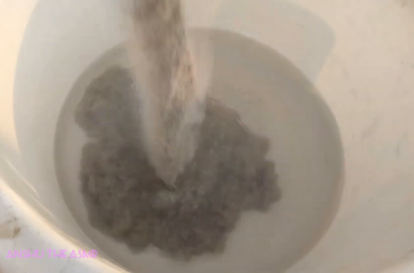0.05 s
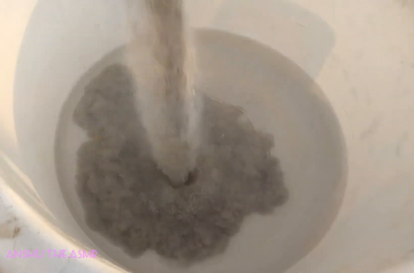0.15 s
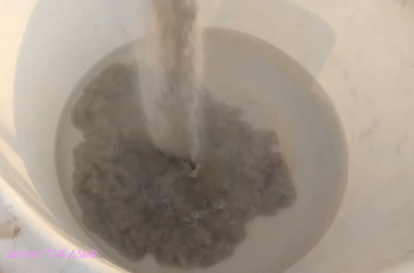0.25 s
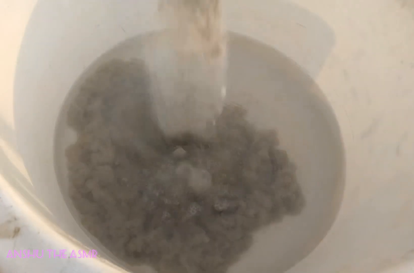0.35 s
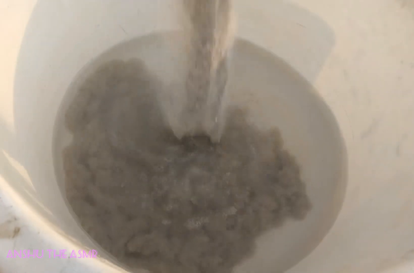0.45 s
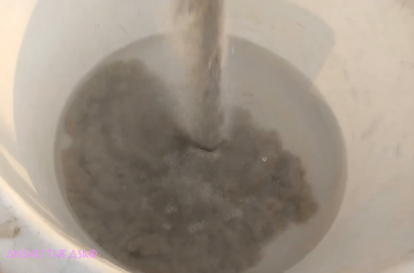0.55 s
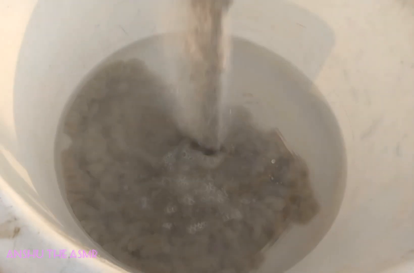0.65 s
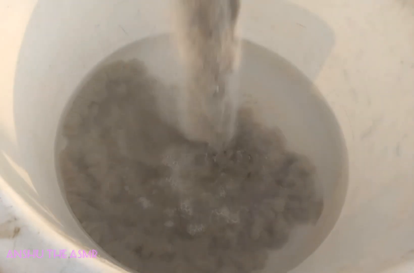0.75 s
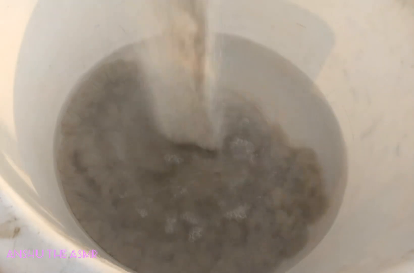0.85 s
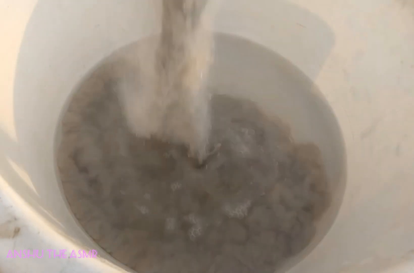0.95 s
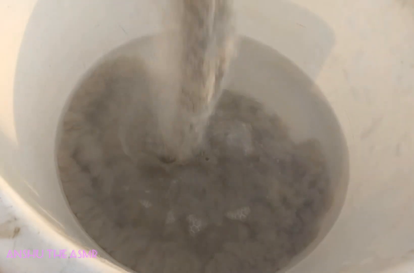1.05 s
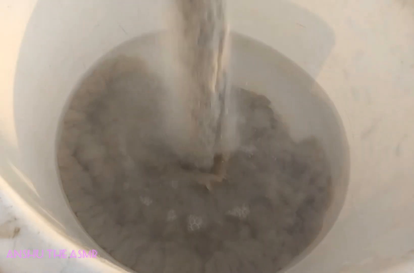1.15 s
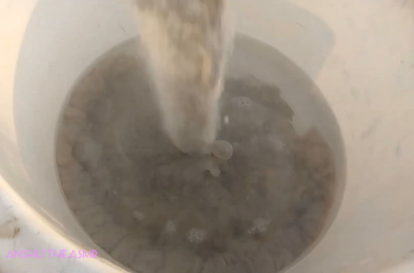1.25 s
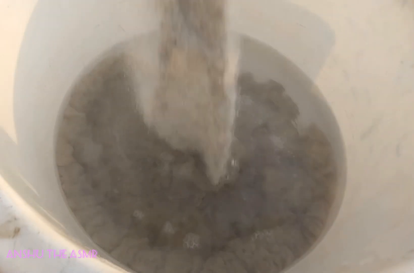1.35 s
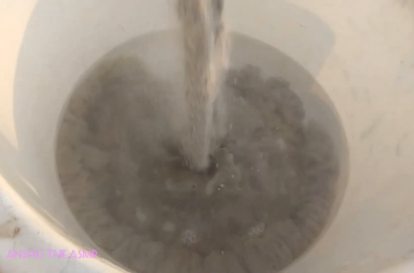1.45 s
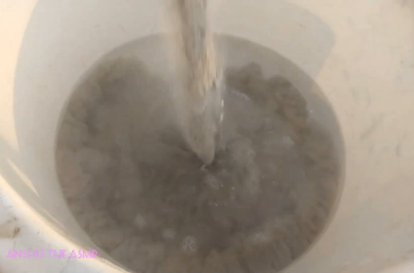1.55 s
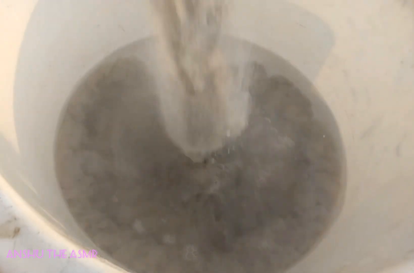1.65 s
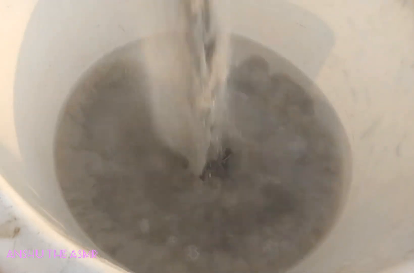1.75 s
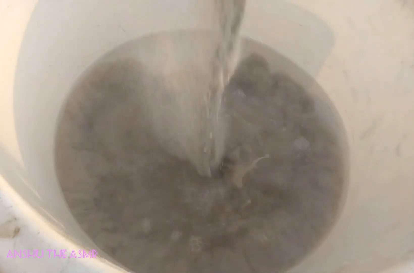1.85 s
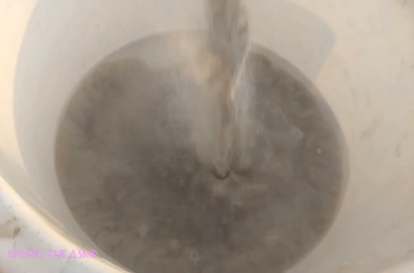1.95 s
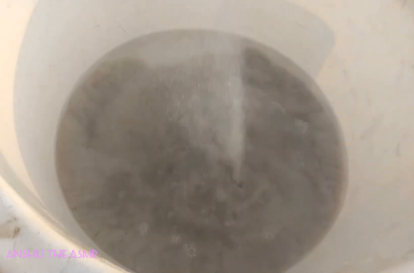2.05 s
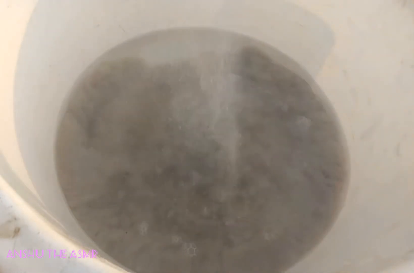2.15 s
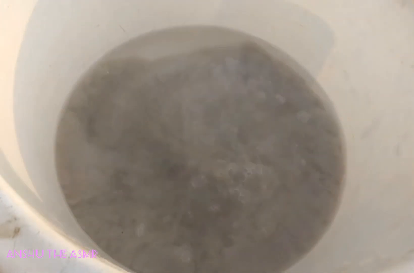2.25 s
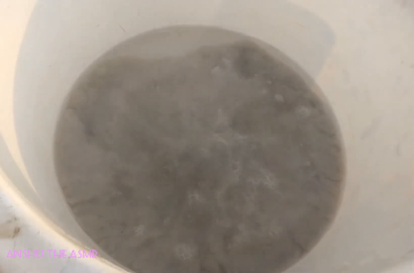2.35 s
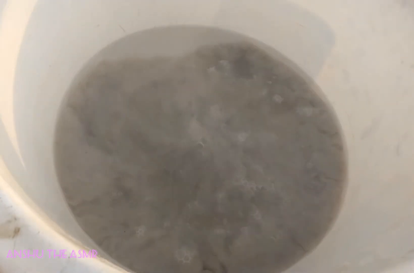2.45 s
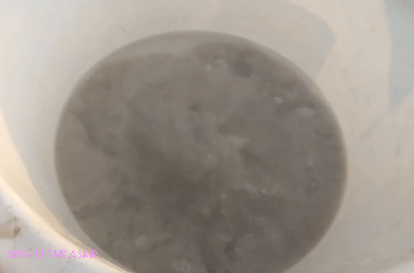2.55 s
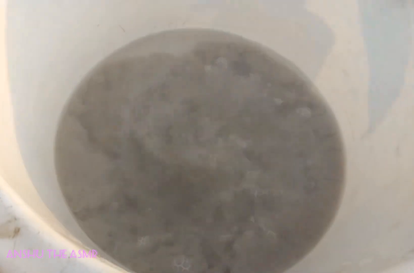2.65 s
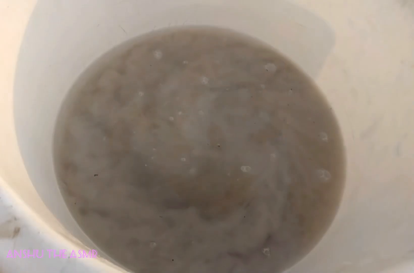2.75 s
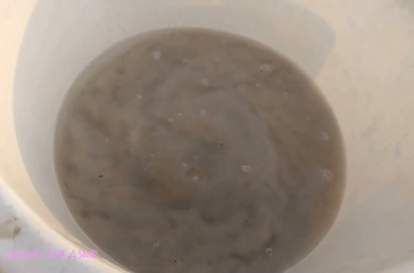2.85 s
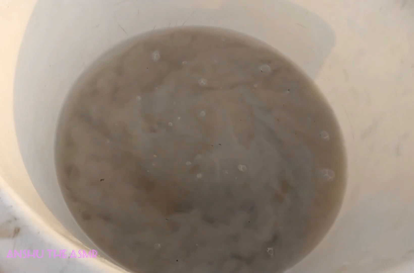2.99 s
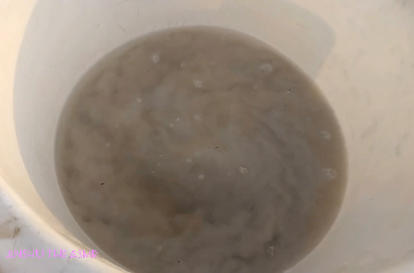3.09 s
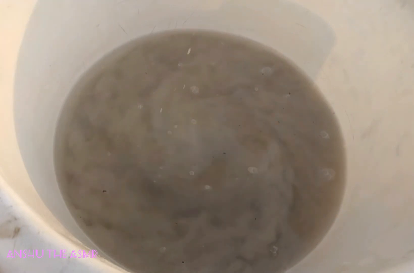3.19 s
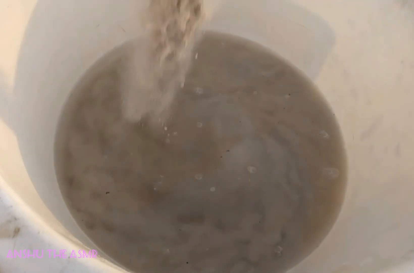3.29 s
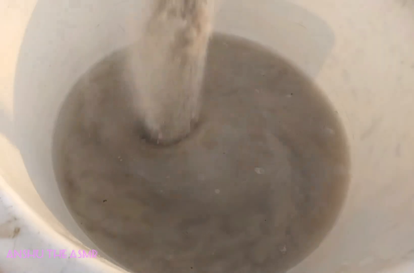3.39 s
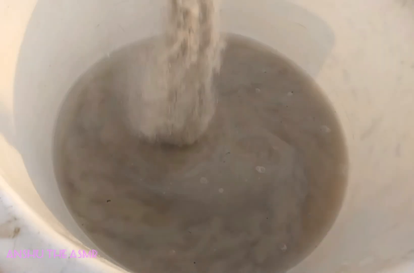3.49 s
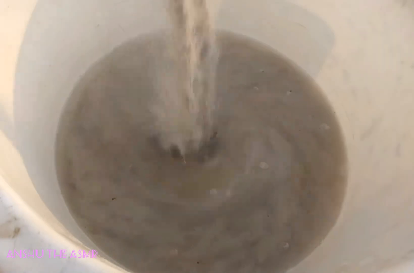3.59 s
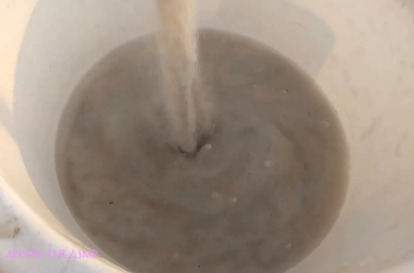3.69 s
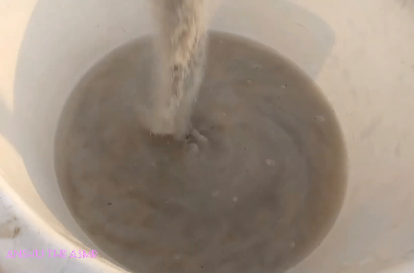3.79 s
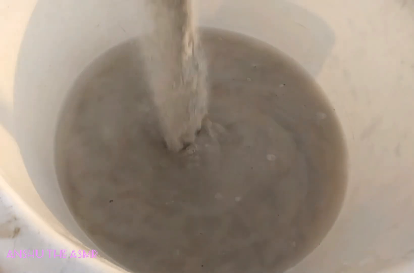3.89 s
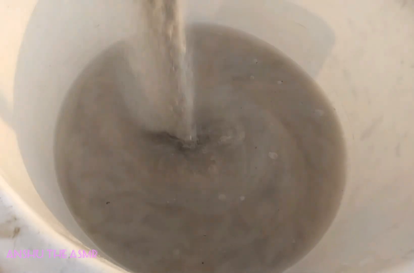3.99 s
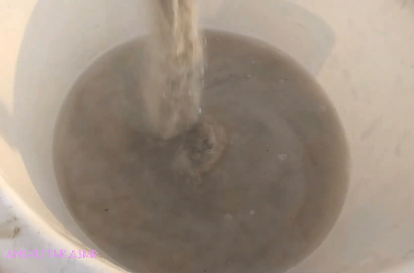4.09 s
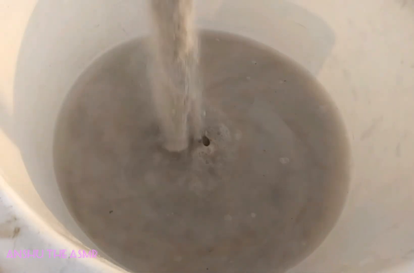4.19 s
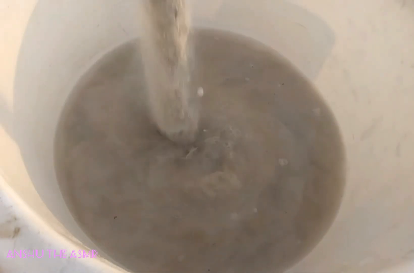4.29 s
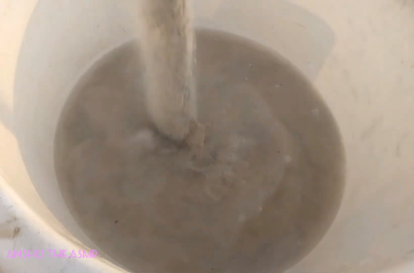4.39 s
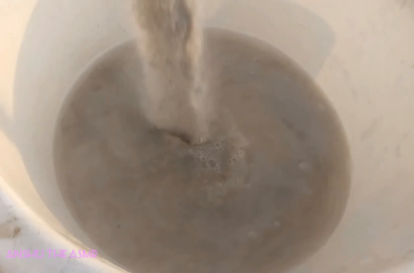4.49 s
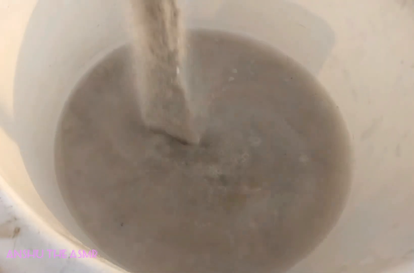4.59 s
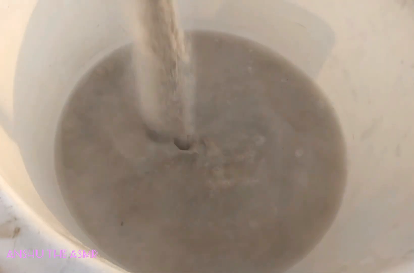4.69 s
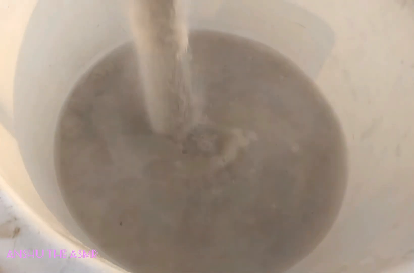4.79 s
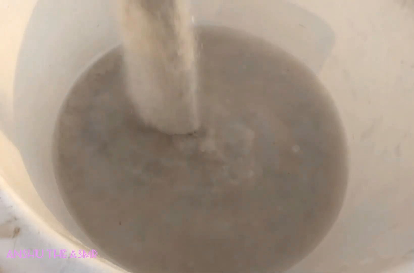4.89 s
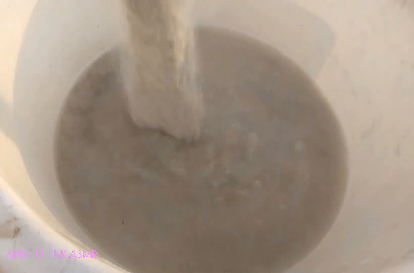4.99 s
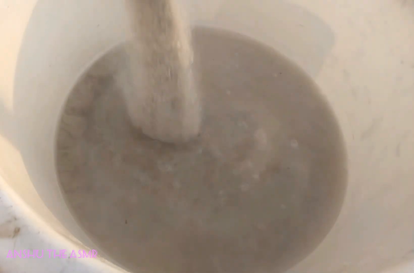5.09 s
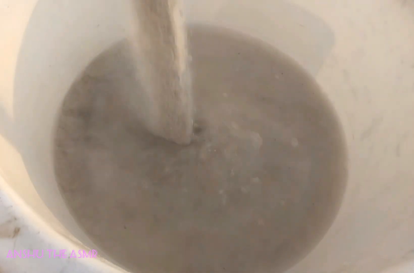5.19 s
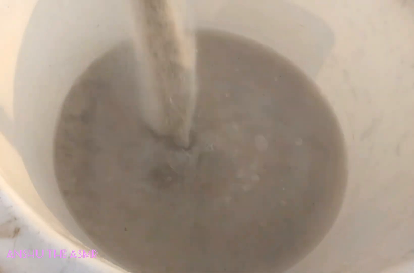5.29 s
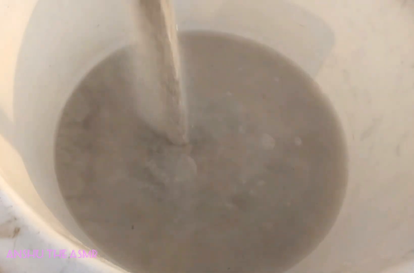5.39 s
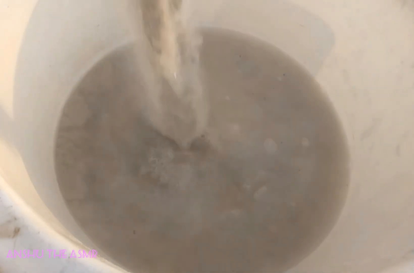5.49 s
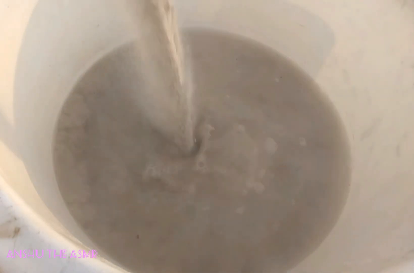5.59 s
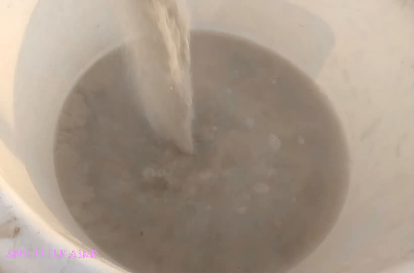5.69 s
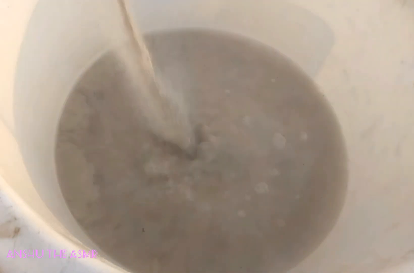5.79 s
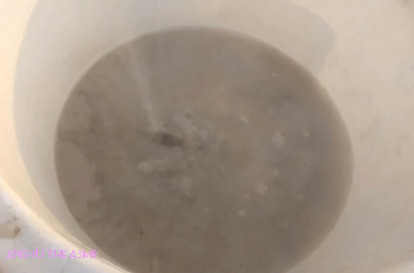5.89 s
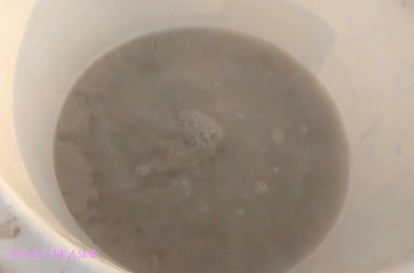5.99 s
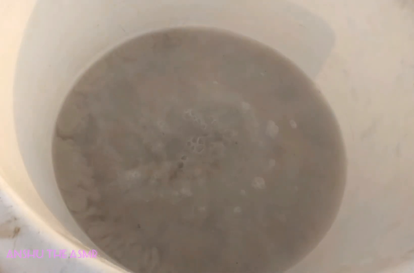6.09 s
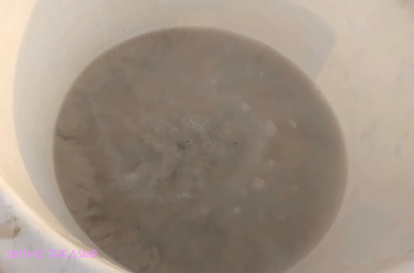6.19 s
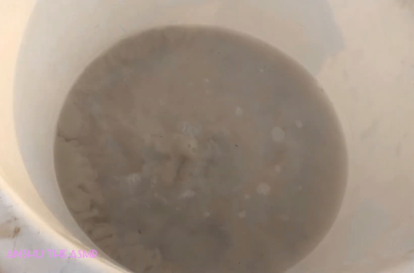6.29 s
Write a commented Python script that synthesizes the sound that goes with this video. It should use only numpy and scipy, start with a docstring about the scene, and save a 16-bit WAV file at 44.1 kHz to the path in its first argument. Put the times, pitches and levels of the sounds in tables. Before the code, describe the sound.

Sand falls into water in a small plastic tub, heard very near: uneven rushing splashes, ringing bubbles, gurgles and fine fizz. The first pour dies away, leaving soft open air and distant engines; a second pour follows and stops with a few last plops. Traffic rumble grows late, a bird chirps faintly, and the almost mono sound cuts out twice for an instant.

```python
"""Outdoors at a plastic tub of water: two streams of fine sand fall in, one after the other, heard close up.
The sand drags air under: bubbles of all sizes ring in clumps, and modes of the air in the tub colour them.
Plops, gushes and ticks of spray stand out as single events built from ringing bubbles and noise bursts.
Distant traffic drones behind over open air, as coloured noise and wavering tones; a bird whistles once, a sine.
The image is nearly mono, and the sound drops out twice for a moment."""
import sys
import numpy as np
from scipy import signal
from scipy.io import wavfile
from scipy.ndimage import uniform_filter1d

SR = 44100
rng = np.random.default_rng(int(sys.argv[2]) if len(sys.argv) > 2 else 0)


def generate_wav(sig):
    """Save sig (samples, or channels by samples) to the path in sys.argv[1] as 16-bit PCM at SR."""
    pcm = np.round(np.clip(np.atleast_2d(sig).T, -1, 1) * 32767).astype(np.int16)
    wavfile.write(sys.argv[1], SR, pcm)


N = 279594
T = np.arange(N) / SR

# moments of silence: from_s, to_s
GAPS = [(2.6722, 2.6945), (4.501, 4.5598)]


def gain_of(db):
    """Decibels to an amplitude factor."""
    return 10 ** (np.asarray(db) / 20)


def evened(x):
    """Scales a sound to rms 1."""
    return x / np.sqrt(np.mean(x ** 2) + 1e-20)


def read(points, hz):
    """Reads a spectrum at hz, with straight lines on a log-frequency axis."""
    point_hz, value = np.transpose(points)
    return np.interp(np.log(hz + 1), np.log(point_hz + 1), value)


def coloured(x, taps):
    """Passes a sound through a filter."""
    return signal.oaconvolve(x, taps)[:len(x)]


def taps_of(shape_db):
    """Causal filter with the gain shape_db(hz): minimum phase from the log gain."""
    hz = np.fft.rfftfreq(4096, 1 / SR)
    half = np.log(gain_of(np.maximum(shape_db(hz), -100)))
    full = np.concatenate([half, half[-2:0:-1]])
    return np.fft.ifft(np.exp(np.conj(signal.hilbert(full)))).real[:2048]


def drift(hz, count):
    """Random wander of rms 1: noise smoothed below hz."""
    sos = signal.butter(2, hz, fs=SR, output="sos")
    return evened(signal.sosfilt(sos, rng.standard_normal(count)))


def patchy(points, patch_db, frames_wide, bins_wide):
    """Noise of a given colour whose level drifts in patches of time and pitch."""
    hz = np.fft.rfftfreq(2048, 1 / SR)
    real, imaginary, patches = rng.standard_normal((N // 512 + 5, len(hz), 3)).T
    patches = uniform_filter1d(patches, bins_wide, 0)
    patches = evened(uniform_filter1d(patches, frames_wide, 1))
    level_db = read(points, hz)[:, None] + patch_db * patches
    spectrum = (real + 1j * imaginary) * gain_of(level_db)
    return evened(signal.istft(spectrum, nperseg=2048, noverlap=1536)[1][:N])


def tone(hz, db):
    """A sine of moving pitch and rms level, its phase summed from the pitch."""
    return gain_of(db) * np.sqrt(2) * np.sin(2 * np.pi * np.cumsum(hz) / SR)


def add(mix, s, sound, db):
    """Adds a short sound at time s with the given peak."""
    part = mix[round(s * SR):][:len(sound)]
    part += gain_of(db) * sound[:len(part)] / abs(sound).max()


def within(events, start_s, end_s):
    """The events that begin while a stream lasts."""
    return [event for event in events if start_s <= event[0] < end_s]


def open_air():
    """The air around the tub: soft coloured noise, uneven in time and pitch."""
    # spectrum: pitch_hz, level_db (per Hz)
    air_colour = [(350, -17.5), (600, -10), (1200, -12.5), (2900, -22), (4200, -27), (6500, -40),
                  (8200, -30.5), (10000, -43), (12500, -47), (15500, -44)]
    # level over time: time_s, level_db
    air_level = [(0, -53), (2.67, -52.5), (2.75, -55.5), (2.86, -51.5), (3.05, -54.5), (6.34, -51.5)]
    noise = patchy(air_colour, 1.6, frames_wide=5, bins_wide=20)
    return gain_of(np.interp(T, *np.transpose(air_level))) * noise


def traffic():
    """A low noise drone with two wavering tones standing out, over a slowly growing rumble."""
    # drone and engine tone: time_s, drone_db, tone_hz, tone_db
    passing = [(0.0, -51.5, 246, -64), (0.5, -48.5, 246.8, -51.5), (0.8, -47.5, 246, -58),
               (0.95, -48, 245, -63), (1.35, -47, 247.7, -59.5), (1.78, -44, 252, -52),
               (2.05, -43.5, 243, -50.5), (2.3, -47, 238, -50), (2.46, -42.5, 237, -45),
               (2.48, -47, 202.5, -49.5), (2.67, -41.5, 200, -39), (2.7, -48.5, 235, -53),
               (2.98, -49, 232.5, -59.5), (3.05, -49, 232.3, -44), (3.3, -46, 232, -46.5),
               (3.42, -47.5, 225, -52), (3.55, -47.5, 231, -46.5), (3.7, -49, 231.5, -54.5),
               (4.1, -44.5, 230, -53), (4.29, -43, 226.5, -54), (4.56, -45, 215, -59),
               (4.71, -35.5, 203.5, -42.5), (4.95, -36, 208.8, -43.5), (5.3, -38.5, 200.1, -43.5),
               (5.8, -38, 197, -51), (6.03, -36.5, 196.7, -45), (6.34, -46.5, 193, -45.5)]
    # lower engine tone that roams in pitch: time_s, tone_hz, over_drone_db
    low_tone = [(0, 163.4, -14), (2.67, 170.6, -10), (2.9, 159.4, -3.5), (4.0, 143.4, -11),
                (4.3, 140.1, -6.5), (4.7, 166, -3), (5.1, 165.1, -14), (5.9, 140.7, -2.5),
                (6.34, 149.4, -2.5)]
    # drone spectrum: pitch_hz, level_db (per Hz)
    drone_colour = [(59, -49), (100, -34), (128, -6.5), (194, -2), (243, -5), (350, -3.5), (404, -6),
                    (520, -22), (1000, -36), (1300, -43), (2200, -120)]
    # rumble spectrum: pitch_hz, level_db (per Hz)
    rumble_colour = [(15, -62), (25, -48), (45, -35), (70, 9.5), (100, 10), (130, 19), (200, -62)]
    # rumble over time: time_s, level_db
    rumble_level = [(0, -58.5), (3.8, -53.5), (4.6, -52.5), (6.34, -44.5)]

    s, *curves = np.transpose(passing)
    drone_db, high_hz, high_db = (np.interp(T, s, curve) for curve in curves)
    s, *curves = np.transpose(low_tone)
    low_hz, low_over_db = (np.interp(T, s, curve) for curve in curves)
    low_hz = low_hz * (1 + 0.05 * drift(2.93, N))

    out = gain_of(drone_db) * patchy(drone_colour, 2.4, frames_wide=11, bins_wide=2)
    rumble_db = np.interp(T, *np.transpose(rumble_level))
    out += gain_of(rumble_db) * patchy(rumble_colour, 2.4, frames_wide=14, bins_wide=2)
    for hz, db, flutter_db in ((low_hz, drone_db + low_over_db, 3.5), (high_hz, high_db, 2.2)):
        waver = hz * (1 + 0.007 * drift(10, N))
        out += tone(waver, db + flutter_db * drift(22.4, N))
    return out


def bird():
    """A far bird's falling whistle: a sine whose pitch flutters quickly at random."""
    # time_s, pitch_hz, level_db
    whistle = [(5.955, 3900, -75), (5.981, 3800, -59), (6.03, 3560, -56), (6.075, 3350, -66)]
    s, hz, db = np.transpose(whistle)
    pitch = np.interp(T, s, hz) * (1 + 0.045 * drift(250, N))
    return tone(pitch, np.interp(T, s, db, -120, -120))


def puff(hz, width_hz, seconds):
    """A short spindle of noise around hz: many grains breaking the surface at once."""
    t = np.arange(int(3 * seconds * SR) + 8) / SR
    edges = np.clip([hz - width_hz / 2, hz + width_hz / 2], 100, 20000)
    sos = signal.butter(2, edges, "band", fs=SR, output="sos")
    envelope = t / seconds * np.exp(-2.4 * t / seconds)
    return signal.sosfilt(sos, rng.standard_normal(len(t))) * envelope


def bubble(hz, cycles, glide, rise):
    """A bubble swells over about `rise` cycles, dies 60 dB over `cycles` and climbs in pitch by `glide`."""
    turns = np.arange(int(cycles / hz * SR) + 8) * hz / SR
    swell = (1 - np.exp(-turns / rise)) ** 2
    ring = np.sin(2 * np.pi * turns * (1 + glide * turns / cycles))
    return gain_of(-60 * turns / cycles) * swell * ring


def ticks(out, start_s, end_s, bright_ring):
    """Fine spray bursting at the surface: tiny bright puffs of noise coloured by the tub."""
    # start_s, peak_db
    spray_bursts = [(0.2468, -29), (0.372, -30), (0.552, -21), (0.6, -30), (0.6604, -28), (0.799, -32),
                    (0.8555, -26.5), (0.879, -29), (0.924, -27.5), (1.1, -27), (1.349, -28), (1.508, -27),
                    (1.549, -14.5), (1.625, -23), (1.6576, -30), (1.6846, -32), (1.8667, -34), (1.938, -25),
                    (1.9534, -24), (2.206, -26), (2.3046, -37), (2.318, -42), (2.366, -43), (2.48, -50),
                    (2.548, -50), (2.635, -50), (3.192, -51), (3.206, -52), (3.224, -51), (3.263, -43),
                    (3.3169, -29), (3.3413, -33), (3.388, -37), (3.4203, -26), (3.445, -23.5), (3.482, -23),
                    (3.5344, -33), (3.5665, -31), (3.5912, -27), (3.662, -25), (3.743, -26), (3.799, -23),
                    (3.911, -27), (3.9616, -30), (4.0903, -25), (4.1335, -25), (4.2462, -25.5),
                    (4.2857, -32), (4.389, -28), (4.4393, -33), (4.45, -19), (4.4914, -25), (4.5875, -31),
                    (4.625, -18.5), (4.6493, -29), (4.7042, -33), (4.8344, -28), (4.876, -24.5),
                    (4.981, -25), (5.07, -20.5), (5.1, -23), (5.153, -23), (5.2096, -25), (5.234, -26.5),
                    (5.413, -28), (5.488, -38), (5.6274, -24), (5.718, -34), (5.779, -39), (5.811, -39),
                    (5.869, -35), (5.933, -32)]
    for s, db in within(spray_bursts, start_s, end_s):
        burst = puff(9000 * 2 ** rng.uniform(-0.38, 0.39), 9000, 0.0023)
        add(out, s, np.convolve(burst, bright_ring[:300]), db)


def gushes(out, start_s, end_s, ring):
    """Wide splashes: noise that swells and fades, coloured by the tub."""
    # middle_s, peak_db, length_s
    wide_splashes = [(0.284, -26.5, 0.03), (0.322, -24.5, 0.025), (0.373, -16, .018), (0.493, -32, 0.021),
                     (0.557, -21.5, .012), (0.64, -28, 0.019), (0.711, -20, 0.014), (0.793, -25.5, 0.032),
                     (0.883, -23, .015), (0.94, -21, 0.043), (0.979, -27, 0.023), (1.025, -34, 0.035),
                     (1.134, -34, 0.02), (1.331, -29, 0.038), (1.444, -29, 0.028), (1.517, -24, .016),
                     (1.571, -20.5, 0.036), (1.625, -24, 0.029), (1.66, -31, .025), (1.701, -24.5, 0.018),
                     (1.773, -21, 0.026), (1.84, -28, 0.024), (1.881, -23.5, 0.031), (1.943, -18, 0.016),
                     (1.956, -25, .012), (2.143, -28, 0.029), (2.22, -25, 0.056), (3.39, -21.5, .018),
                     (3.435, -30, 0.017), (3.483, -27, 0.032), (3.566, -24, .015), (3.609, -25.5, 0.027),
                     (3.65, -27, 0.027), (3.797, -22.5, 0.035), (3.901, -27, 0.03), (3.976, -35, .02),
                     (4.106, -32, 0.028), (4.244, -28, 0.045), (4.396, -25.5, 0.027), (4.448, -19.5, 0.023),
                     (4.492, -24.5, .018), (4.601, -22, .02), (4.633, -24, 0.017), (4.706, -20, 0.027),
                     (4.746, -24.5, 0.031), (4.879, -21, .012), (4.948, -35, .015), (4.98, -21, .012),
                     (5.066, -21, .025), (5.104, -24, 0.018), (5.172, -18.5, .025), (5.416, -27, 0.02),
                     (5.602, -22.5, .02), (5.631, -15, .009)]
    for s, db, length in within(wide_splashes, start_s, end_s):
        window = np.hanning(round(length * SR))
        grains = rng.standard_normal(len(window)) * window
        add(out, s - length / 2, np.convolve(grains, ring[:600]), db)


def risers(out, start_s, end_s):
    """Late bubbles nearing the surface, their pitch climbing steeply."""
    # start_s, peak_db, starting_hz
    late_bubbles = [(2.549, -47, 946), (2.558, -44, 760), (2.625, -48, 820), (2.655, -52, 1610)]
    for s, db, hz in within(late_bubbles, start_s, end_s):
        add(out, s, bubble(hz, cycles=60, glide=0.7, rise=3), db)


def plops(out, start_s, end_s, ring):
    """Lumps of sand plunging, each with one large ringing bubble and a splash of noise."""
    # time_s, peak_db (of the bubble), bubble_hz
    lumps = [(0.032, -32.5, 4480), (0.2144, -30.5, 1970), (0.2753, -28, 2530), (0.301, -27, 1300),
             (0.310, -23, 2900), (0.3695, -21.5, 2880), (0.377, -27.5, 646), (0.444, -23, 3100),
             (0.450, -27.5, 590), (0.463, -22.5, 2290), (0.493, -22, 3100), (0.5177, -25, 3110),
             (0.574, -27.5, 1290), (0.638, -27.5, 1190), (0.6688, -27, 3680), (0.709, -11.5, 1740),
             (0.7237, -18.5, 1620), (0.746, -23, 1310), (0.759, -26, 2120), (0.781, -18.5, 1770),
             (0.7969, -15.5, 2440), (0.804, -25, 540), (0.838, -21, 2260), (0.8492, -16.5, 3420),
             (0.861, -24, 1290), (0.882, -21.5, 2200), (0.887, -28, 560), (0.917, -23.5, 2320),
             (0.9416, -28, 920), (0.949, -22, 3340), (0.9727, -25, 3250), (0.9814, -24.5, 1170),
             (0.983, -29.5, 573), (1.016, -25, 586), (1.1, -28.5, 3270), (1.13, -27.5, 880),
             (1.2213, -30, 2350), (1.2388, -27.5, 1000), (1.2501, -27, 2140), (1.28, -20, 2280),
             (1.2997, -18.5, 1380), (1.3122, -19.5, 1330), (1.335, -33, 600), (1.3488, -24, 3650),
             (1.3954, -26.5, 2310), (1.441, -21, 1290), (1.4522, -24, 2400), (1.4863, -30, 3280),
             (1.508, -24.5, 1350), (1.511, -22.5, 574), (1.516, -22.5, 3230), (1.569, -23, 1710),
             (1.579, -27, 1730), (1.5907, -20.5, 3560), (1.623, -21, 2270), (1.626, -25, 650),
             (1.6477, -17, 2170), (1.694, -20.5, 1335), (1.7376, -18, 3320), (1.767, -19, 2230),
             (1.8063, -19, 2250), (1.8415, -28.5, 1150), (1.876, -24, 2320), (1.9111, -27, 2690),
             (1.9396, -27, 1194), (1.939, -26, 2950), (1.954, -23, 2670), (1.9957, -29, 2230),
             (2.136, -29, 2100), (2.16, -25.5, 1310), (2.211, -27.5, 1690), (2.222, -24, 3560),
             (2.27, -32, 606), (3.317, -26, 3570), (3.3878, -20.5, 1640), (3.388, -14.5, 2710),
             (3.432, -24, 1730), (3.453, -17, 1645), (3.5413, -33, 2640), (3.5658, -32, 1460),
             (3.5957, -20.5, 2250), (3.6068, -24.5, 2460), (3.6464, -21, 2590), (3.7527, -30, 2610),
             (3.799, -23, 1760), (3.804, -31, 536), (3.8624, -27, 1230), (3.8713, -22, 1700),
             (3.892, -20.5, 2310), (3.917, -19, 2690), (3.9614, -27, 2740), (4.002, -30, 604),
             (4.0264, -31, 3770), (4.0991, -30, 3630), (4.1255, -27, 1560), (4.1333, -32, 2640),
             (4.1836, -30, 2570), (4.1969, -26.5, 1290), (4.2143, -24, 2320), (4.229, -23, 1390),
             (4.247, -21, 2260), (4.246, -28, 356), (4.26, -22.5, 2670), (4.3126, -27.5, 2600),
             (4.3453, -22, 1540), (4.365, -24, 2550), (4.3954, -22, 2610), (4.402, -25, 1720),
             (4.447, -20, 2660), (4.4507, -15.5, 5040), (4.467, -24.5, 1730), (4.4896, -27, 484),
             (4.572, -24, 2440), (4.5967, -23, 1600), (4.6299, -30, 2530), (4.68, -22, 1530),
             (4.7021, -29, 3420), (4.7378, -22, 2600), (4.8221, -35, 2620), (4.8753, -27, 3720),
             (4.891, -24, 3720), (4.9428, -25.5, 2600), (4.964, -29, 2670), (4.981, -20.5, 3470),
             (5.064, -26, 2650), (5.071, -22.5, 2670), (5.084, -26, 2630), (5.103, -21.5, 514),
             (5.126, -26, 530), (5.1276, -19, 2630), (5.173, -29, 1750), (5.226, -34, 2620),
             (5.359, -27, 2670), (5.413, -20, 3674), (5.6, -25.5, 1636), (5.6296, -16, 1850),
             (5.6285, -9, 2650), (5.74, -32, 2720), (5.903, -35.5, 3147), (5.919, -33, 4090),
             (5.929, -32.5, 4370)]
    rise_s = 0.0014
    for s, db, hz in within(lumps, start_s, end_s):
        cycles = 23.5 + 5.5 * np.log2(hz / 2000)  # smaller bubbles ring more cycles
        drop = bubble(hz, cycles, glide=0.021, rise=max(rise_s * hz, 1))
        add(out, s - rise_s / 2, drop, db)
        splash = np.convolve(puff(max(hz, 2300), 2800, 0.005), ring[:600])
        # 9 dB under a -23.5 dB bubble; harder plops splash more
        add(out, s, splash, db - 9 + 0.63 * (db + 23.5))


def swarm(lo_hz, hi_hz, per_s, cycles, spread_db, clumps, count):
    """Bubbles and puffs of many sizes at random moments, a few louder, riding the clumps of sand."""
    n = len(clumps)
    loudness = gain_of(spread_db * np.minimum(rng.exponential(1, n), 3.2))
    size = loudness * (rng.random(n) < per_s / SR) * clumps
    kind, out = rng.integers(0, count, n), np.zeros(n)
    for k, hz in enumerate(np.geomspace(lo_hz, hi_hz, count)):
        if k % 4 == 0:
            grain = puff(hz, 0.5 * hz, 0.0028)
        else:
            grain = bubble(hz, cycles, glide=0.076, rise=0.94)
        at = np.flatnonzero((kind == k) & (size > 0))
        rings = size[at, None] * grain * np.sqrt(hz / np.sum(grain ** 2))
        places = at[:, None] + np.arange(len(grain))
        out += np.bincount(places.ravel(), rings.ravel(), n)[:n]
    return evened(out)


def stream(rows, modes):
    """Five sizes of bubbling and spray share the clumps of falling sand and the tub's colour; events join them."""
    # colour of the splash without the tub: pitch_hz, level_db (per Hz)
    splash_colour = [(300, -35), (450, -3), (800, -7.5), (1300, -3.5), (2500, -4), (4500, -11.5),
                     (6500, -23.5), (8200, -9), (10000, -22), (12500, -28), (15500, -14)]
    # each size: (level at full flow dB, share of the flow it follows, share of the depth it follows)
    sizes = {"gurgle": (-45, 0.88, 0.12), "plunge": (-37.5, 1, 1), "splash": (-37.5, 1, 0.04),
             "fizz": (-47.5, 0.78, 0.017), "mist": (-56.5, 0.58, 0)}
    full_flow_db = -36
    slosh = 0.016  # share by which the rocking surface shifts the tub's modes

    s, flow_db, depth_db, pockets_db = np.transpose(rows)
    a, b = round(s[0] * SR), min(round(s[-1] * SR), N)
    count = b - a
    flow_db = np.interp(T[a:b], s, flow_db - full_flow_db)
    depth_db = np.interp(T[a:b], s, depth_db)
    pockets_db = np.interp(T[a:b], s, pockets_db)
    clumps_db = 2.48 * drift(28, count) + 1.42 * drift(48, count)
    spray = rng.standard_normal(count)  # grains too small and many to tell apart

    def tub(hz, shift=1):
        """Each mode lifts, or notch cuts, a bell around its pitch."""
        bells = (db / (1 + (2 * (hz - f * shift) / width) ** 2) for f, width, db in modes)
        return read(splash_colour, hz) + sum(bells)

    low = taps_of(lambda hz: tub(hz, 1 - slosh))
    high = taps_of(lambda hz: tub(hz, 1 + slosh))
    ring = taps_of(tub)
    bright_ring = taps_of(lambda hz: tub(hz) - 14 / (1 + (hz / 5800) ** 8))
    rock = 0.5 + 0.5 * np.tanh(drift(6.3, count))

    def level(size):
        """Gain of one size as flow and depth change."""
        db, by_flow, by_depth = sizes[size]
        return gain_of(db + by_flow * flow_db + by_depth * depth_db)

    def layer(lo_hz, hi_hz, per_s, cycles, spread_db, spray_db, clumping):
        """One size band of bubbles and spray, rocking between the two tub colours."""
        own_db = 0.85 * drift(25, count)  # each size also bunches by itself
        clumps = gain_of(clumping * clumps_db + own_db)
        grains = swarm(lo_hz, hi_hz, per_s, cycles, spread_db, clumps, count=24)
        sound = grains + gain_of(spray_db) * evened(clumps * spray)
        rocked = coloured(sound * rock, high) + coloured(sound * (1 - rock), low)
        edges = signal.butter(3, [lo_hz, hi_hz], "band", fs=SR, output="sos")
        return evened(signal.sosfilt(edges, rocked))

    out = np.zeros(N)
    out[a:b] = level("gurgle") * gain_of(pockets_db) * layer(398, 915, 300, 24.8, 2.4, 2.3, 0.37)
    out[a:b] += level("plunge") * layer(877, 1997, 600, 45, 2.7, -1.7, 0.68)
    out[a:b] += level("splash") * layer(2017, 5690, 1100, 53, 3.1, -3, 0.9)
    out[a:b] += level("fizz") * layer(5550, 11480, 1600, 72, 4.7, -1.2, 0.91)
    out[a:b] += level("mist") * layer(11300, 15500, 1500, 45, 3.8, 2.5, 0.55)
    plops(out, s[0], s[-1], ring)
    risers(out, s[0], s[-1])
    gushes(out, s[0], s[-1], ring)
    ticks(out, s[0], s[-1], bright_ring)
    return out


def scene():
    """All sources in the middle; between the two dropouts the treble is a little wider."""
    # sand arriving, one table a stream: time_s, flow_db, depth_db (large bubbles over small),
    # pockets_db (extra gurgle of the largest air pockets)
    streams = [
        [(0.0, -39, -8.5, -6), (0.14, -54.5, -9, 1), (0.21, -45, -4, -9), (0.29, -36, 0.5, -7),
         (0.355, -37, 2, 2), (0.39, -37, -1, 5), (0.5, -35.5, -7.5, 4.5), (0.61, -43.5, 0, -25),
         (0.64, -36.5, -5, -18), (0.7, -38.5, 9, 8.5), (0.84, -33.5, -6, 1.5), (1.03, -34, -0.5, 7.5),
         (1.055, -45, 0, -2), (1.14, -35, -3, 1), (1.17, -48.5, -3, 8), (1.2, -34, -11, -13),
         (1.29, -38, 10, 8), (1.42, -36, -4.5, 2), (1.48, -36, -4.5, -1), (1.63, -29.5, 0, -0.5),
         (1.7, -36.5, 0.5, 6), (1.75, -45.5, 7.5, 7.5), (1.8, -41.5, 2.5, 9.5), (1.83, -39, 2.5, -11),
         (1.9, -38, 1.5, -9), (1.955, -32, 1, -10), (1.98, -43, -1.5, 3.5), (2.12, -37.5, -7, -9.5),
         (2.22, -39, 1.5, 1), (2.28, -43.5, 0.5, 1), (2.34, -54, 3, 9), (2.5, -61.5, 3, 8), (2.67, -64, 4, 11)],
        [(3.15, -93, 8, 0), (3.26, -77, 0, 4), (3.29, -38.5, -14, -21), (3.4, -30.5, 1, -10),
         (3.5, -35.5, -7, -7), (3.64, -34, -3.5, -2), (3.68, -37.5, -8, -0.5), (3.73, -43, -1, -2),
         (3.77, -38, -5, -13), (3.8, -37, -3, -4), (3.9, -35.5, 5.5, 1.5), (4.0, -36, -8, 2.5),
         (4.06, -38, -5, -6), (4.19, -35.5, 1, 4), (4.43, -37.5, -5, 0), (4.5, -34, -1.5, -1),
         (4.75, -37, -1.5, 2), (4.775, -40.5, -6, 7), (4.82, -38.5, -7.5, 2), (4.9, -34, -1.5, 0.5),
         (4.99, -37.5, -6.5, 5), (5.09, -31, -4, -2), (5.21, -36.5, 1.5, 2), (5.28, -41.5, -4, 7.5),
         (5.41, -33.5, -6, -5), (5.47, -43, -2.5, 1), (5.54, -36.5, -5.5, -1), (5.61, -35.5, -2, -10),
         (5.66, -42, -4, 2.5), (5.94, -48.5, -3, 0), (6.0, -60, 4, 11), (6.34, -65.5, 3.5, 8)],
    ]
    # air modes of the tub above the water, before and after it has risen: mode_hz, width_hz, lift_db
    tub_modes = [
        [(574, 83, 9), (1310, 810, 3.5), (2250, 210, 10), (3280, 280, 9.5), (4180, 280, 8.5), (5330, 1600, 8.5)],
        [(567, 200, 9.5), (1150, 250, 1.5), (1810, 810, 6.5), (2650, 200, 10), (3630, 460, 9),
         (5270, 2000, 9.5)],
    ]
    # notches where the water surface's reflection cancels the direct sound,
    # before and after the rise: notch_hz, width_hz, lift_db (negative)
    notches = [
        [(1620, 130, -7)],
        [(1967, 62, -10.5), (2900, 110, -3)],
    ]
    # width of the treble: pitch_hz, side_over_mid_db
    width_colour = [(3500, -80), (5000, -50), (6500, -14), (8000, -35), (9500, -19), (11500, -1),
                    (14000, -7), (15500, -20)]

    mid = open_air() + traffic() + bird()
    for rows, modes, dips in zip(streams, tub_modes, notches):
        mid += stream(rows, modes + dips)
    between = (T > GAPS[0][1]) & (T < GAPS[1][0])
    scattered = mid * between * drift(270, N)
    side = coloured(scattered, taps_of(lambda hz: read(width_colour, hz)))
    return np.array([mid + side, mid - side])


def record(dry):
    """Two dropouts with a quick fade-out and a short fade-in, then the band limit."""
    fade_out_s, fade_in_s, edge_hz = 0.0008, 0.0051, 15950
    on = np.ones(N)
    for start_s, end_s in GAPS:
        falling = np.clip((start_s - T) / fade_out_s, 0, 1)
        rising = np.clip((T - end_s) / fade_in_s, 0, 1)
        on *= np.where(T < start_s, falling, rising)
    low_pass = signal.firwin(511, edge_hz, window=("kaiser", 9), fs=SR)
    return signal.oaconvolve(dry * on, low_pass[None], "same")


dry = scene()
out = record(dry)
generate_wav(out)
```